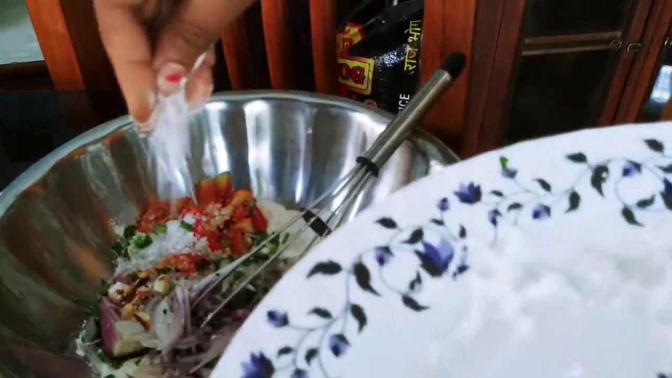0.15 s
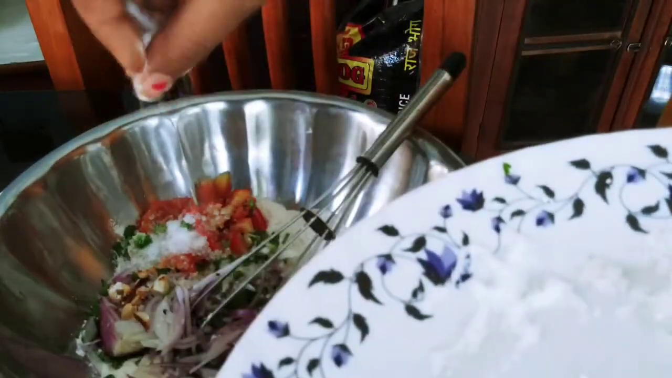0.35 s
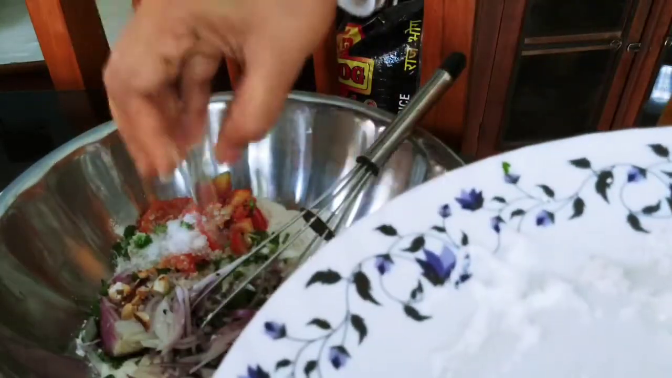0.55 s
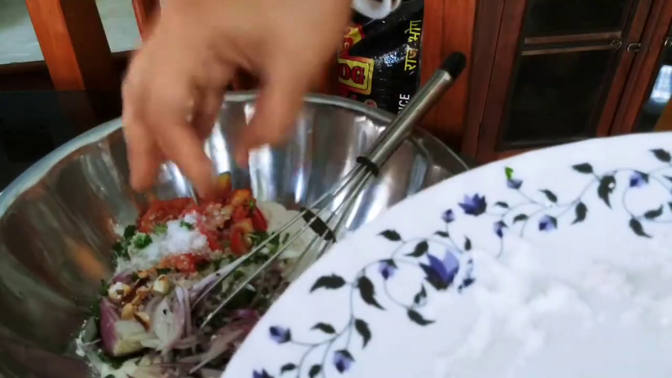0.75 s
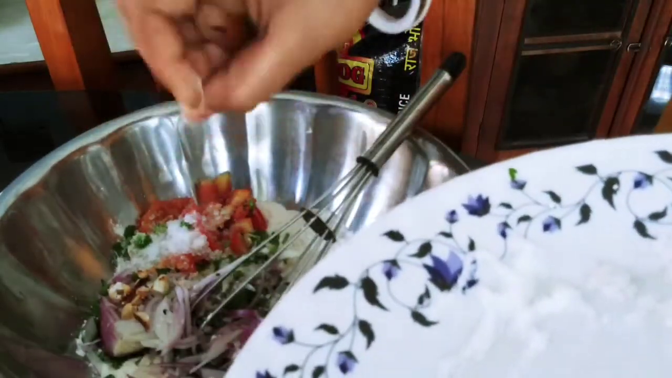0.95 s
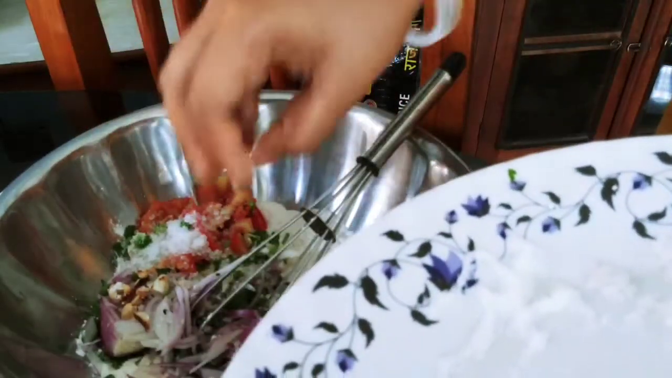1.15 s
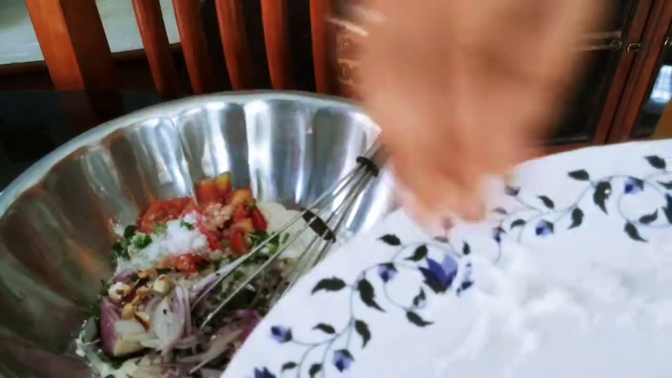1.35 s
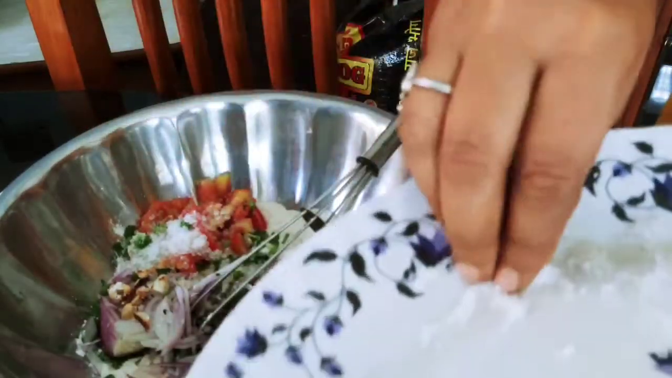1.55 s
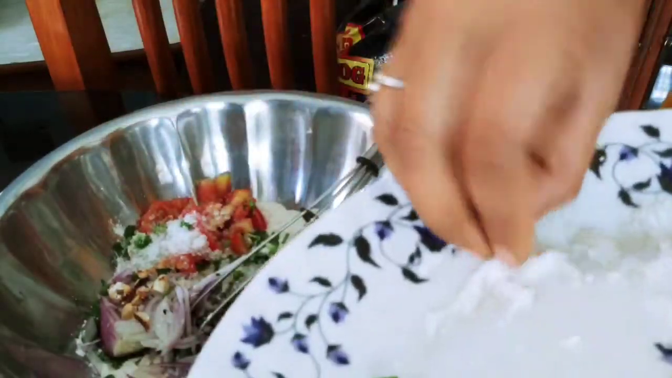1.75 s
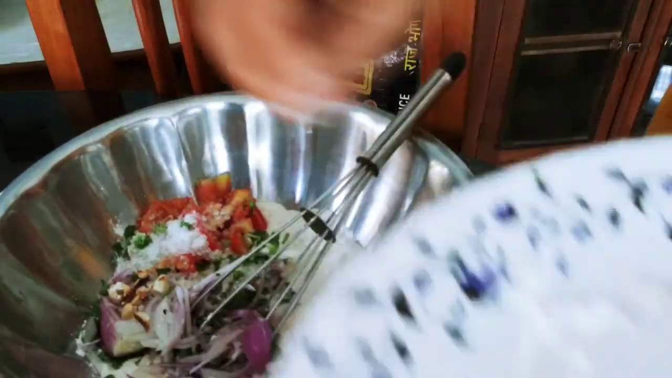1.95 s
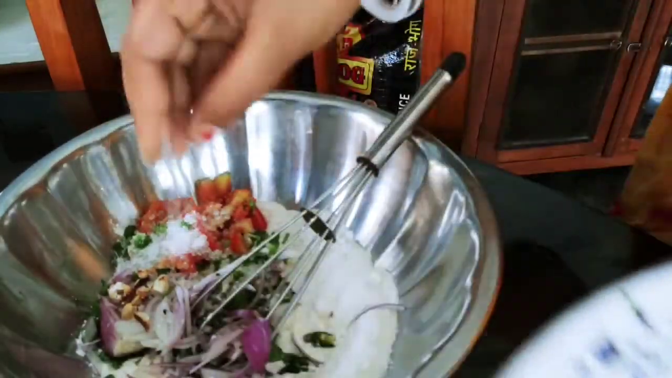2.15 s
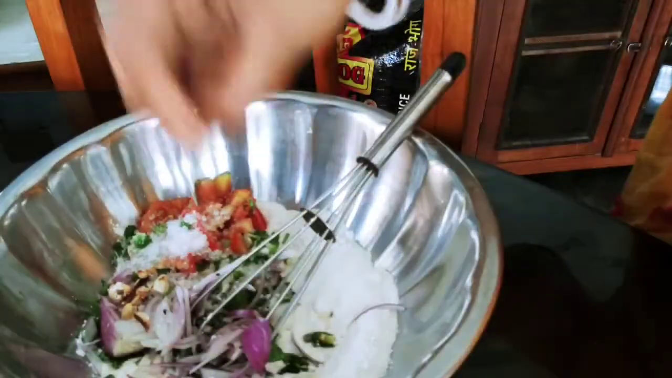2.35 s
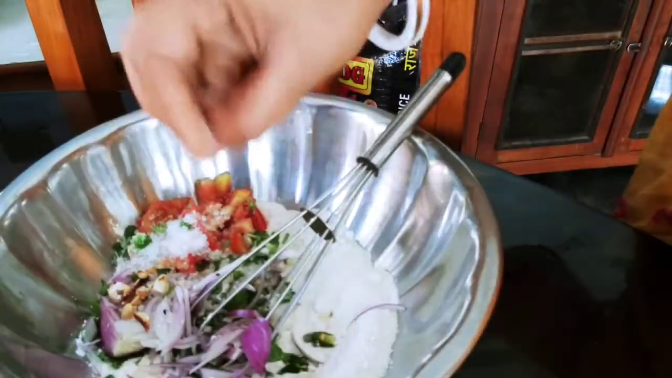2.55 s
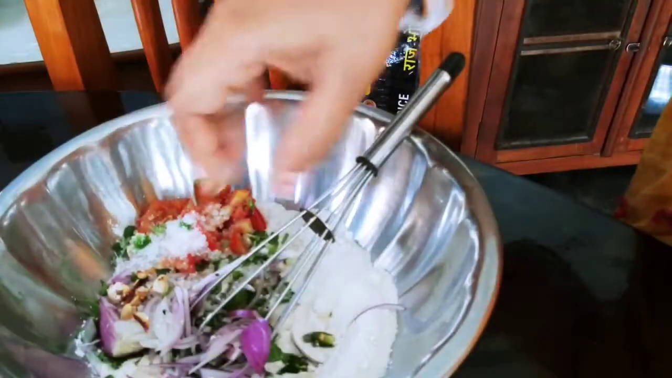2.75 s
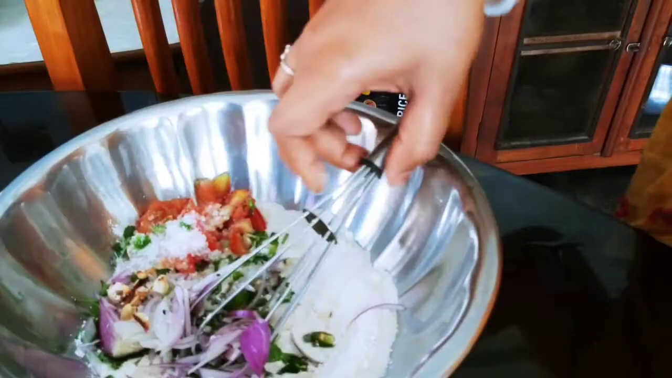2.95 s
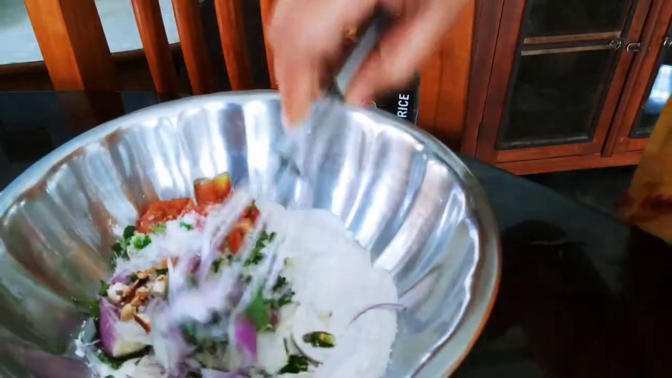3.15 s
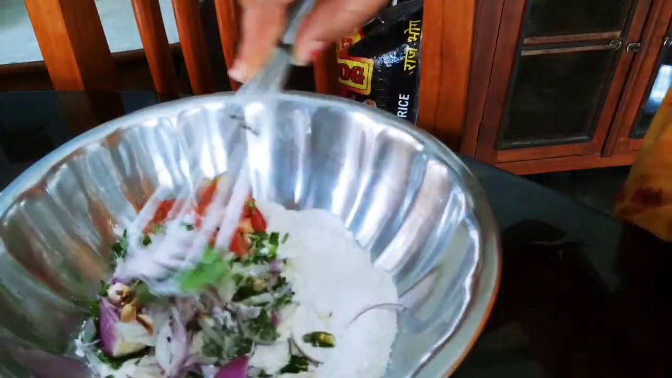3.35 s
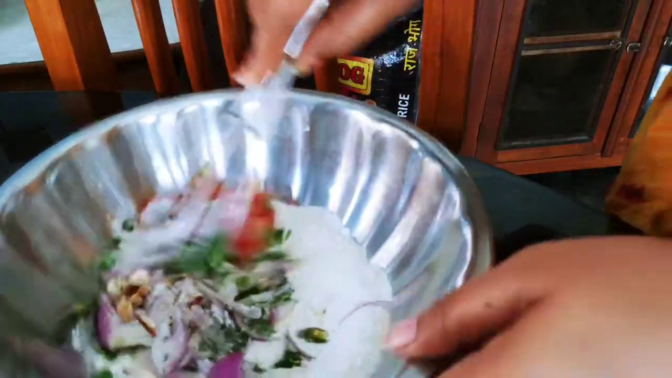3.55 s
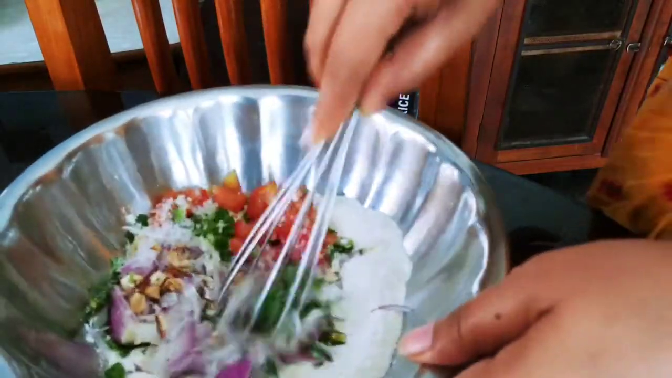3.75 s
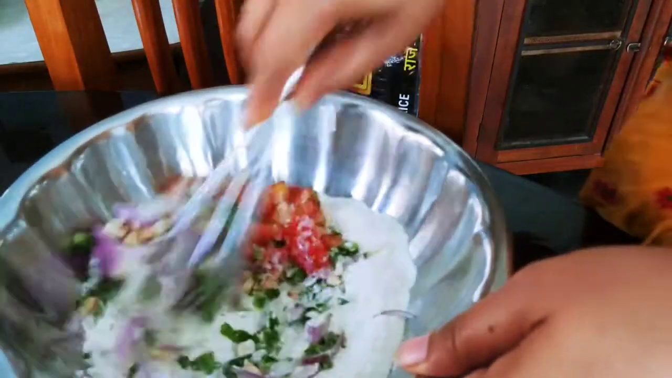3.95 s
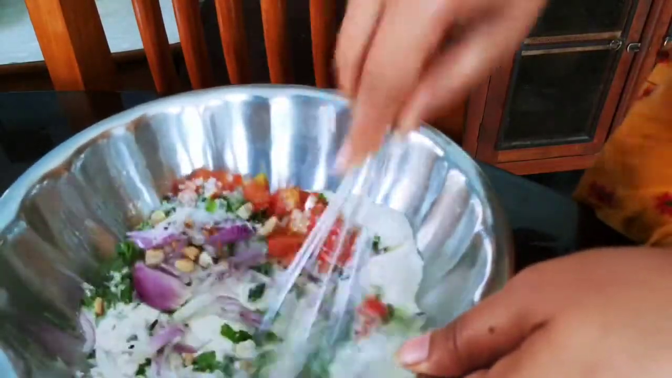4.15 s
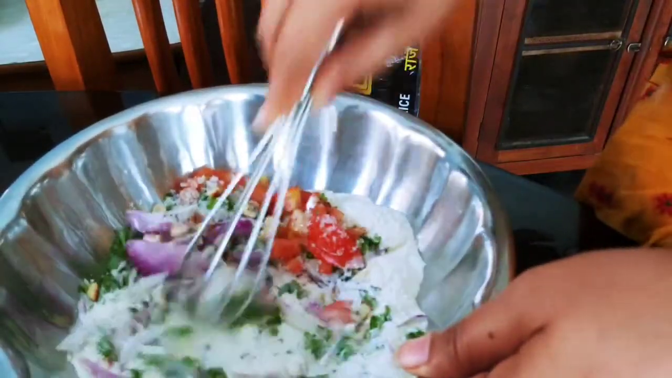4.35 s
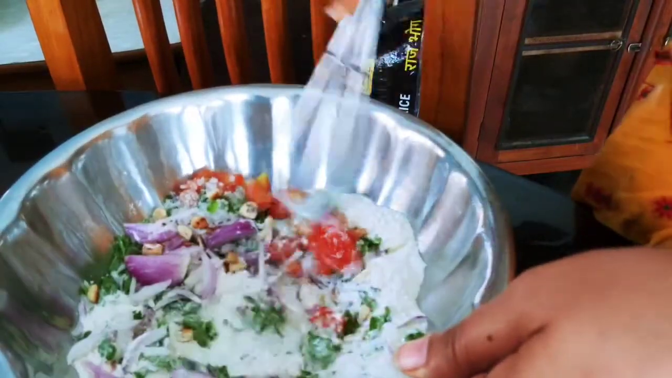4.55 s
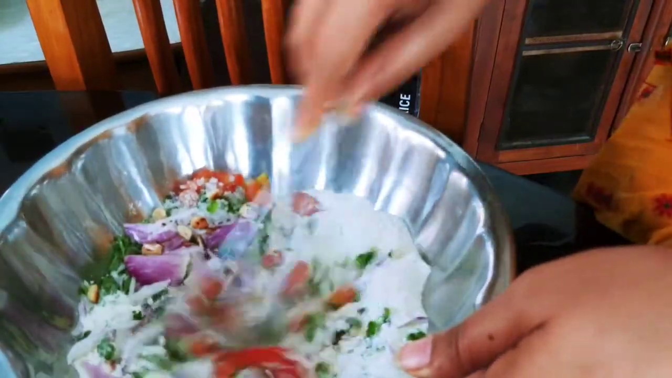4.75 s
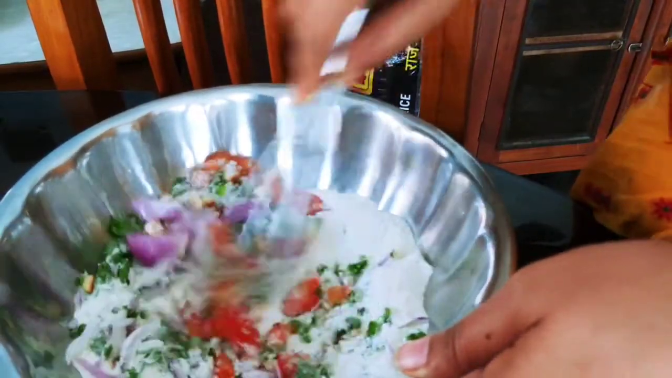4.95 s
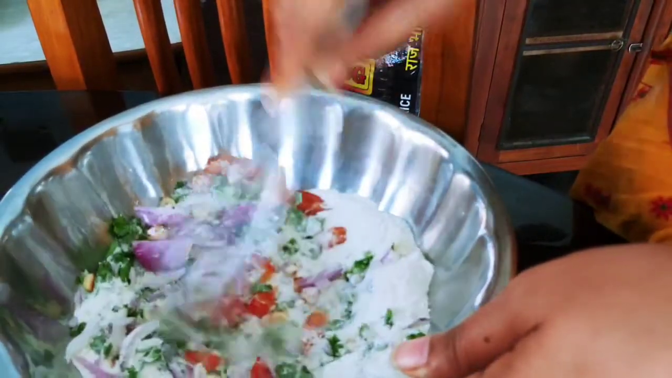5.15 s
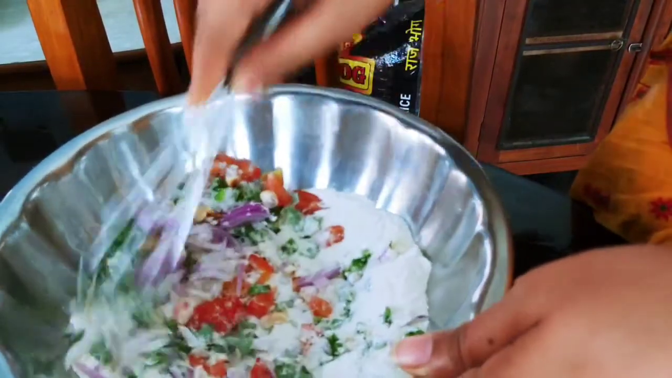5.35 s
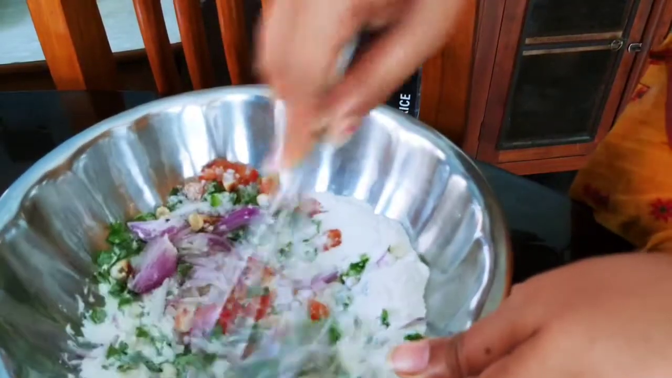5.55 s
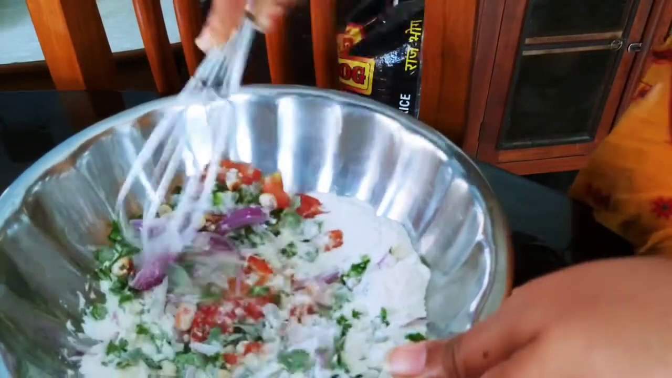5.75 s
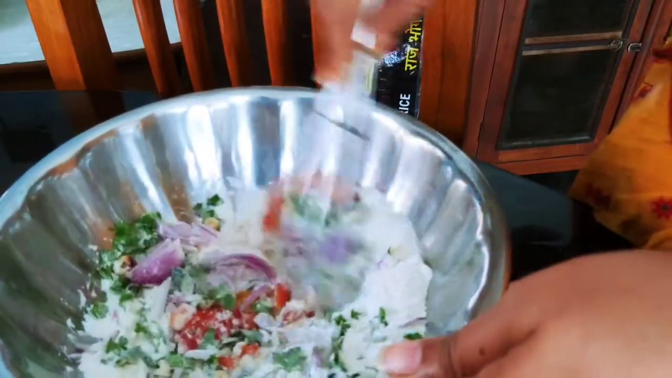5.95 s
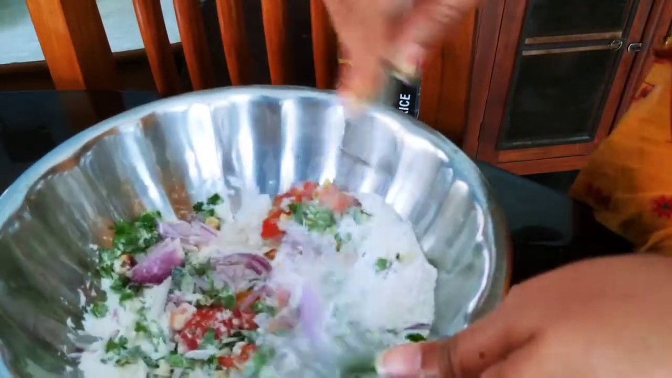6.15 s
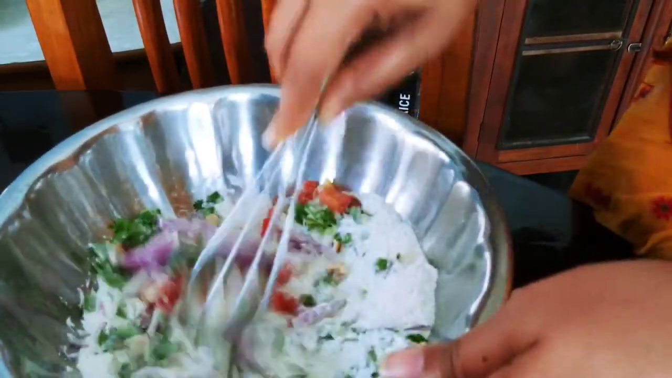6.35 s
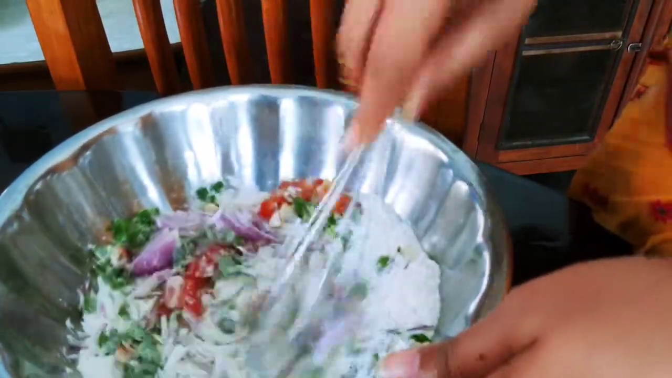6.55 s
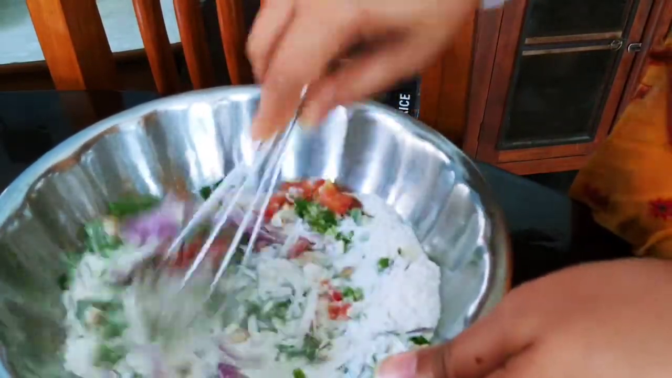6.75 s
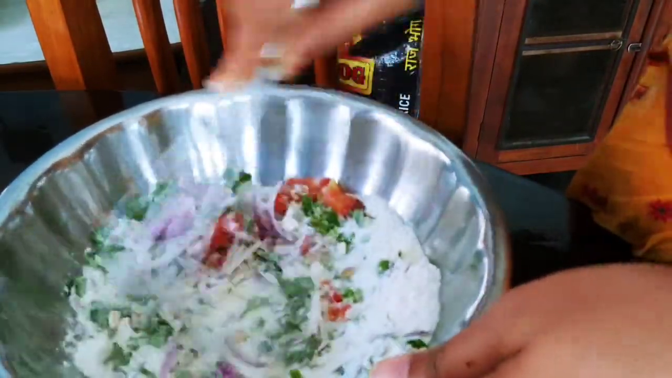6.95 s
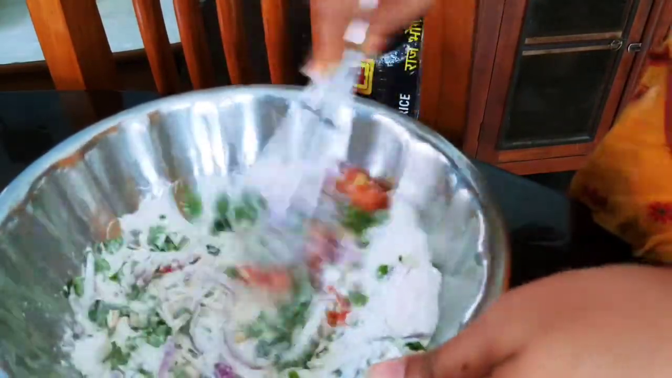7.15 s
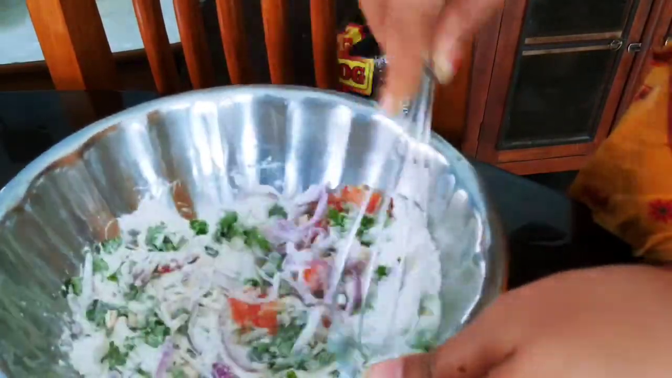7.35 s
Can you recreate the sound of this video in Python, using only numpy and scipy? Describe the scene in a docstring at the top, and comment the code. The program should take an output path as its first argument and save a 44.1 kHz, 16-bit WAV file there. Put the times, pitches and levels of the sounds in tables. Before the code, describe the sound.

Fingers softly sprinkle salt, a plate thuds down, and a wire whisk clicks and scrapes through vegetables in a steel bowl.

```python
"""Salt and a whisk in a steel bowl

In a quiet tiled kitchen, fingers sprinkle salt and pinch more from a plate, which rings softly.
A sleeve or the plate shifts with a dull thump, then the plate is set down with a thud and a chink.
A wire whisk knocks the rim of a steel bowl, then ploughs through flour and chopped vegetables,
clicking and squeaking on the steel. The room answers every hit with a short echo."""
import sys
import numpy as np
from scipy import signal
from scipy.fft import rfft, irfft, next_fast_len
from scipy.io import wavfile
from scipy.ndimage import uniform_filter1d

SR = 44100
rng = np.random.default_rng(int(sys.argv[2]) if len(sys.argv) > 2 else 0)


def pcm_store(signal):
    """Save signal as 16-bit PCM."""
    levels = np.round(np.clip(np.atleast_2d(signal), -1, 1) * 32767)
    wavfile.write(sys.argv[1], SR, levels.astype(np.int16).T)


N = 326061

# Low noise through table and floor. Each row: time in seconds, level in dB.
RUMBLE_LEVELS = [(0.0, -71), (0.43, -62), (0.68, -70.5), (1.25, -67), (2.36, -69), (2.65, -66.5),
                 (2.94, -72), (3.02, -55.5), (3.29, -63.5), (4.4, -66), (4.73, -68.5), (5.72, -55),
                 (6.25, -60), (6.52, -55.5), (6.79, -61), (7.39, -61)]
# Low hums and soft thuds. Each row: start in seconds, level in dB, pitch in Hz, length in seconds.
HUMS = [(.14, -52, 142.6, 0.41), (1.454, -48, 75, 0.013), (2.101, -51, 92.6, 0.15),
        (2.402, -57.5, 90, 0.081), (3.044, -47.5, 92.5, 0.19), (4.249, -52.5, 98.6, 0.16),
        (6.28, -49, 100, 0.095), (6.554, -52.5, 114.7, 0.18), (6.568, -42, 274, 0.035)]

# Hand movements. Each row: start and length in seconds, levels of the middle, dull and bright parts
# in dB, drift of the middle part over the length in dB.
HAND_RUSTLES = [(0.0, 0.18, -89, -60, -75.5, -4), (.25, 0.053, -64, -55, -68, -1),
                (.465, 0.023, -68, -66, -71, -2), (.535, 0.066, -62, -58, -61.5, -2.5),
                (.575, 0.063, -61, -52.5, -52, -7), (1.01, 0.017, -84, -72, -68.5, -7),
                (2.07, 0.38, -86.5, -56.5, -93, -15.5), (2.21, 0.011, -94, -80, -66.5, -7),
                (2.243, .012, -94, -80, -76, 2.5), (2.42, 0.091, -82.5, -67, -87, 0.5)]  # fingers rub salt, and a sleeve or the plate shifts with a dull thump
PINCHES = [(1.458, 0.028, -61, -64, -71, 0), (1.51, 0.031, -54, -57, -65, -0.5),
           (1.61, 0.05, -62, -81, -73, -0.5)]  # fingers pinch salt off the plate
WHISK_STROKES = [(2.93, 0.15, -64.5, -51, -65.5, -1.5), (3.508, 0.14, -58, -57.5, -58, 4),
                 (3.66, 0.23, -59.5, -64.5, -68, 4), (3.864, 0.31, -50, -62, -49, -9.5),
                 (4.2, 0.14, -57.5, -55.5, -58.5, 2), (4.606, 0.33, -51.5, -60, -52.5, -3.5),
                 (4.94, 0.058, -50.5, -81, -55, 2.5), (5.06, 0.17, -60.5, -59.5, -68.5, -2),
                 (5.358, 0.16, -51.5, -44, -50, -9.5), (5.47, 0.37, -54, -52.5, -51.5, -14),
                 (5.828, 0.37, -49.5, -52, -47, -15), (6.262, 0.017, -73, -69, -69.5, -4),
                 (6.285, 0.24, -53.5, -54, -55, -1.5), (6.575, 0.085, -60.5, -51, -61, 1),
                 (6.69, 0.11, -53, -49.5, -51.5, -0.5), (6.81, 0.06, -59, -57, -60, -4),
                 (6.985, 0.05, -72, -62, -67.5, 3.5), (7.045, 0.2, -57, -57.5, -56.5, -1.5),
                 (7.365, 0.02, -95, -64, -76, 10)]
# Single blows. Each row: time in seconds, strength in dB (each part of the sound adds its own offset).
NAIL_TAPS = [(1.456, -44), (1.5103, -38), (1.6306, -46.5)]
PLATE_LANDINGS = [(2.6978, -8)]
RIM_KNOCKS = [(3.033, -15.5), (3.048, -18)]
# Wires skid on steel. Each row: start and length in seconds, level in dB, first and last pitch in Hz.
WIRE_SKIDS = [(2.992, 0.035, -48, 2110, 2060), (4.094, 0.13, -54, 2950, 2476), (3.8, 0.29, -57, 779, 777),
              (4.262, 0.058, -50, 539, 557), (4.303, 0.096, -52, 777, 779), (4.631, 0.22, -62, 777, 780),
              (4.77, 0.02, -38.5, 3057, 3010), (4.795, 0.02, -40.5, 2880, 2800),
              (4.815, 0.014, -41.5, 2820, 2780), (4.936, 0.04, -55, 3040, 3240),
              (4.989, .03, -44, 3205, 2860), (5.014, 0.047, -53, 2750, 2750),
              (5.07, 0.044, -50, 3130, 2855), (5.11, 0.17, -58, 259.7, 262), (5.118, 0.18, -58.5, 515, 472),
              (6.04, 0.22, -58.5, 580, 506), (6.253, 0.1, -53.5, 568, 557),
              (6.316, 0.16, -49.5, 2930, 2830), (6.572, 0.072, -45, 2850, 2770),
              (6.716, 0.18, -53, 2750, 2650), (7.041, 0.055, -53, 2068, 2070)]
# Wires strike the bowl. Each row: time in seconds, clack level in dB, pitch in Hz, snap and crunch
# in dB above the clack, left minus right in dB.
WIRE_CLICKS = [(3.511, -40, 1560, -2, 8.5, 3), (3.533, -41, 2060, 6.5, -3, 2),
               (3.566, -33.5, 3060, -0.5, -8, -8), (3.6, -41, 1520, 10.5, -2, 4),
               (3.605, -36, 1950, -6, 0, 12), (3.864, -39.5, 855, -2, 11.5, 7),
               (3.877, -40, 840, 12, 7, -4), (3.924, -19.5, 2020, -31, -9.5, 2),
               (3.987, -40, 3000, -1, -12, -1), (4.05, -34, 3700, -13, -19, -4),
               (4.202, -39, 3870, -6, -19, 2), (4.298, -35, 3300, -22, -3, -4),
               (4.314, -42.5, 1700, -20, 7, -3), (4.329, -35, 3270, -24, 2, -6),
               (4.611, -38.5, 2980, 10.5, 6.5, 2), (4.624, -29.5, 1320, 0.5, 6, -2),
               (4.697, -30, 3300, 0.5, -16, 7.5), (4.774, -32, 3060, -29, -14, 5),
               (4.954, -30, 3240, -25, -11, 9.5), (4.976, -31, 3320, -14, -5, -5),
               (5.002, -27, 3260, -28, -20, -2), (5.075, -54, 3100, -17, -16, -2),
               (5.357, -7.5, 1970, -20.5, -0.5, 1), (5.48, -33, 760, -2, 9, 6.5),
               (5.492, -28, 3120, -20, -5, -10), (5.659, -39.5, 3040, -32, -6, -12.5),
               (5.704, -39, 2960, -21, -7, -1), (5.801, -30.5, 1890, -22, -1, 6),
               (5.82, -39, 1790, -7, 2, 12), (5.829, -14.5, 2410, -14.5, -5, 4),
               (5.945, -36.5, 1850, -1, -3, 5), (5.961, -34, 3080, -14, -3, -9),
               (6.02, -38.5, 3020, -9, -6, -1), (6.31, -40, 1790, -24, -6, -7),
               (6.344, -34, 2670, -13.5, 4, -6.5), (6.326, -38, 2880, -20, -6, -5),
               (6.422, -32.5, 2880, -6, -1, 0), (6.577, -37, 2800, -22, -17, -9),
               (6.614, -38, 2650, -6, -7, 0), (6.685, -42, 1030, -18, 11.5, -8),
               (6.714, -29, 1360, -22, 6, -1), (6.717, -29, 2220, -15, -15, 4),
               (6.994, -31, 2060, -30, -8, 1), (7.01, -38, 1990, -24, -14, 10),
               (7.05, -42, 2000, -3, -8, 11)]

# The notes struck things ring with. Each row: pitch in Hz, relative level in dB, seconds to fade
# by 60 dB (ring() divides this by its damping).
HELD_PLATE_NOTES = [(1950, 3, 0.19), (2456, -0.5, 0.34), (2810, 7, 0.12), (349, 2.5, 0.12),
                    (4650, -6.5, 0.15)]
PLATE_ON_TABLE_NOTES = [(118, -11, .6), (209, -4, .35), (240, -2, .3), (301, 1, .4), (350, -4, .4),
                        (368, -3, .45), (455, -6, .45), (550, -3, .5), (665, -10, .6), (780, -1, .45),
                        (907, -5, .55), (991, -7, .4), (1400, 0, .4), (1453, 1, .5), (1572, -10, .5),
                        (1720, -12, .3), (1900, -7, .28), (2229, -9, .4), (2400, -5, .5), (2460, -6, .5),
                        (2552, -8, .45), (2700, -10, .4), (3257, -13, .4)]
BOWL_NOTES = [(231, -6, .3), (511, -8, .36), (608, -13, .4), (689, -10, .55), (1050, -12, .4),
              (1230, -4, .25), (1507, -3, .4), (1567, -2, .42), (1836, -8, .28), (2040, -8, .4),
              (2099, -4, .4), (2600, -14, .45), (2719, -13, .26)]

# Tone colours of the noises. Each row: frequency in Hz, relative level in dB.
HUSH_TONE = [(12, -26), (20, -31), (153, -1), (316, -13.5), (481, -8.5), (1110, -14), (1350, -14.5),
             (2790, -15.5), (5590, -31.5), (6610, -26), (7820, -40), (9500, -31), (10900, -53),
             (12200, -24), (15700, -32)]
SALT_TONE = [(76, -33.5), (130, 1), (354, -12.5), (562, -12), (609, -13), (1180, -21.5), (2160, -12),
             (4440, -22), (5640, -21.5), (6500, -21), (11200, -25), (12300, -18), (15700, -14.5)]
THUD_TONE = [(88, -54), (150, -17), (453, -2), (1170, -13.5), (1450, -8.5), (1730, -12.5), (2410, -11),
             (3400, -18), (3900, -29), (5650, -25.5), (6730, -29), (8010, -38.5), (12300, -42),
             (15500, -48)]
FOOD_TONE = [(76, -33), (180, -3), (279, 0), (334, -7.5), (780, -1.5), (1100, -4.5), (2200, -1), (2900, -1),
             (3450, -5.5), (4000, -11.5), (5530, -13), (6630, -10), (7630, -21.5), (9510, -16.5),
             (11200, -34.5), (12300, -14.5), (15700, -20.5)]
SNAP_TONE = [(2350, -10), (4000, -6), (5160, -1), (5880, -24), (6590, -3), (7990, -12), (9910, -8),
             (11200, -19), (15500, -9.5)]
CRUNCH_TONE = [(150, -77), (250, -26), (1420, -8), (2040, -9), (3450, -14.5), (4130, -36), (6000, -33),
               (6670, -22), (7750, -36), (9000, -29), (11700, -84), (19800, -120)]

# The kitchen's echo. Each row: frequency in Hz, seconds to fade by 60 dB.
ROOM_FADE = [(100, 0.25), (500, 0.56), (2000, 0.7), (5000, 0.43), (8000, 0.42), (12000, 0.44)]
# How the two microphones differ. Each row: frequency in Hz, left minus right in dB.
MIC_BALANCE = [(60, -0.9), (400, -3), (1200, -3), (2500, -0.7), (5000, -6), (6000, 3), (6700, 13),
               (7800, 3), (11000, 2.5), (15000, -5.5)]
# How alike left and right are. Each row: frequency in Hz, likeness from 0 (unrelated) to 1 (the same).
MIC_LIKENESS = [(25, 0.3), (60, 1), (300, 0.9), (700, 0.33), (1500, 0), (6000, 0)]

# How movements swell, fade and drift; sets of three are for the middle, dull and bright parts.
FINGER_RISE_DB_PER_S, FINGER_FALL_DB_PER_S = 1102, (403, 393.5, 398)
WHISK_RISE_DB_PER_S, WHISK_FALL_DB_PER_S = 1502, (255, 154, 302)
DRIFT_SHARES = (1.0, 0.86, 2.15)


def gain(db):
    """Turn decibels into a number to multiply by."""
    return 10 ** (np.asarray(db) / 20)


def unit(x):
    """Scale a sound to an average (rms) level of 1."""
    return x / np.sqrt(np.mean(x ** 2))


def unit_peak(x):
    """Scale a sound so its 24 biggest samples are near 1."""
    return x / np.sqrt(np.mean(np.sort(np.abs(x), axis=None)[-24:] ** 2))


def look_up(table, hz):
    """Read between a table's rows on a log frequency scale."""
    freqs, values = np.transpose(table)
    return np.interp(np.log(hz + 1), np.log(freqs), values)


def add(out, start_s, sound):
    """Mix a stereo sound in at the given time."""
    i = int(start_s * SR)
    out[:, i:i + sound.shape[1]] += sound[:, :N - i]


def band(x, low_hz, high_hz):
    """Keep what lies between two frequencies."""
    return signal.sosfilt(signal.butter(2, [low_hz, high_hz], "bandpass", fs=SR, output="sos"), x)


def colour(x, tone):
    """Filter a sound to give it a tone colour."""
    cepstrum = irfft(np.log(gain(look_up(tone, np.fft.rfftfreq(2048, 1 / SR)))))
    cepstrum[1:1024] *= 2  # folded so that nothing sounds ahead of a hit
    cepstrum[1025:] = 0
    response = irfft(np.exp(rfft(cepstrum)))[:1024]
    return signal.fftconvolve(x, response.reshape((1,) * (x.ndim - 1) + (-1,)), axes=-1)[..., :x.shape[-1]]


def excite(x, response):
    """Let every sample of x set off a copy of the response."""
    return signal.fftconvolve(x, response, axes=1)[:, :N]


def stereo(a, b):
    """Blend two noises into left and right, alike in the bass and unrelated in the treble."""
    hz = np.fft.rfftfreq(next_fast_len(N + SR), 1 / SR)
    likeness = np.clip(look_up(MIC_LIKENESS, hz), 0, 1)
    mid = rfft(a, 2 * len(hz) - 2) * np.sqrt((1 + likeness) / 2)
    side = rfft(b, 2 * len(hz) - 2) * np.sqrt((1 - likeness) / 2)
    return np.array([irfft(mid + side), irfft(mid - side)])[:, :len(a)]


def wander(per_s):
    """A smooth random curve that heads for a new value per_s times a second."""
    hold = int(SR / per_s)
    steps = np.repeat(rng.standard_normal(N // hold + 1), hold)
    return unit(uniform_filter1d(uniform_filter1d(steps, hold), hold)[:N])


def burst(fade_s):
    """Two tiny puffs of noise, each spread evenly over all pitches."""
    t = np.arange(512) / SR
    shape = t * np.exp(-t / fade_s)
    x = rng.standard_normal((2, len(t)))
    for _ in range(3):  # each pass evens out the pitches more
        spectrum = rfft(x * shape)
        x = irfft(spectrum / np.abs(spectrum)) / (shape + shape.max() / 10) * shape.max()
    return np.pad(x * shape, ((0, 0), (0, 1536)))


def crack(tone, fade_s):
    """A hit with a tone colour, the same on both sides in the bass."""
    mid, side = burst(fade_s)
    side = signal.sosfilt(signal.butter(1, 600, "highpass", fs=SR, output="sos"), side)
    return unit_peak(colour(np.array([mid + side, mid - side]), tone))


def clack(hz, fade_s, width):
    """A hit with a rough pitch; it reaches the right microphone a little later."""
    x = band(burst(fade_s)[0], hz / width, hz * width)
    return unit_peak(np.array([x, np.roll(x, rng.integers(2, 9))]))


def ring(notes, damping, phase_spread, blur_hz):
    """A struck object's fading notes; two weaker tones close to each make it waver."""
    hz, db, fade_s = np.transpose(notes)[:, :, None]
    t = np.arange(SR // 2) / SR
    phase = phase_spread * rng.uniform(-1, 1, (len(hz), 1)) * (1 - look_up(MIC_LIKENESS, hz))
    phase = np.array([phase, -phase])  # left and right
    below, above = blur_hz * rng.uniform(0.29, 1.53, (2, len(hz), 1))
    neighbours = (1, hz), (0.59, hz - below), (0.51, hz + above)
    tones = sum(size * np.sin(2 * np.pi * f * t + phase) for size, f in neighbours)
    tones *= gain(db - 60 * t * damping / fade_s)
    attack = np.minimum(t / 0.0034, 1)
    return tones.sum(axis=1) * attack / np.sqrt(np.sum(gain(db) ** 2))


def grains(tone, per_s, spread_db, hiss_db):
    """Countless small collisions of uneven size over a smooth hiss."""
    hits = rng.random((2, N)) < per_s / SR
    sizes = np.minimum(rng.exponential(size=(2, N)), 3.5)
    patter = unit(hits * gain(spread_db * sizes) * rng.standard_normal((2, N)))
    hiss = gain(hiss_db) * rng.standard_normal((2, N))
    return unit(colour(stereo(*(patter + hiss)), tone))


def movement_levels(moves, rise_db_per_s, fall_db_per_s):
    """Middle, dull and bright level curves in dB: each move rises fast, drifts, then falls away."""
    t = np.arange(0, N / SR + .002, .002)
    start_s, length_s, *levels, drift_db = np.transpose(moves)[:, :, None]
    progress = np.clip((t - start_s) / length_s, 0, 1)
    before_s, after_s = np.maximum(start_s - t, 0), np.maximum(t - start_s - length_s, 0)
    curves = []
    for db, fall, share in zip(levels, fall_db_per_s, DRIFT_SHARES):
        move_db = db + share * drift_db * progress - rise_db_per_s * before_s - fall * after_s
        power = np.sum(gain(move_db) ** 2, axis=0)
        curves.append(np.interp(np.arange(N) / SR, t, 10 * np.log10(power + 1e-14)))
    return curves


def rustle(x, levels, flicker_db):
    """Grain noise in three parts follows the level curves; they flicker together and a little alone."""
    middle_db, dull_db, bright_db = levels
    parts = ((band(x, 120, 1000), dull_db),
             (-band(x, 1000, 4500), middle_db),  # flipped so the parts add up where they overlap
             (band(x, 4500, 16000), bright_db))
    together = wander(45)
    return sum(unit(part) * gain(db + flicker_db * together + wander(25)) for part, db in parts)


def hush():
    """Air and distant house noise, gently rising and falling."""
    air = unit(colour(stereo(*rng.standard_normal((2, N))), HUSH_TONE))
    return air * gain(-64.5 + 2.4 * wander(4.2))


def rumble():
    """Low noise through table and floor, with soft hums that swell and fade."""
    noise = unit(band(stereo(*rng.standard_normal((2, N))), 25.5, 238))
    level_db = np.interp(np.arange(N) / SR, *np.transpose(RUMBLE_LEVELS))
    out = noise * gain(level_db + 0.7 * wander(22))
    for start_s, db, hz, length_s in HUMS:
        t = np.arange(int(length_s * SR)) / SR
        hum = gain(db) * np.sin(np.pi * t / length_s) * np.sin(2 * np.pi * hz * t)
        add(out, start_s, np.array([hum, hum]))
    return out


def room_echo(x):
    """The walls answer after 6 ms with fading noise; the middle pitches last longest."""
    t, tail = np.arange(SR) / SR, 0
    for hz in 60 * 2 ** np.arange(0, 8.1, .5):
        noise = band(rng.standard_normal((2, SR)), hz / 2 ** .25, hz * 2 ** .25)
        tail = tail + noise * gain(-60 * t / look_up(ROOM_FADE, hz))
    tail = stereo(*(tail * (t > .006)))
    return excite(x.mean(axis=0, keepdims=True), tail / np.sqrt(np.sum(tail[0] ** 2)))


def hands_and_salt():
    """Rubbed salt patters, a sleeve or the plate shifts, and pinching salt off the plate makes it sing."""
    patter = grains(SALT_TONE, per_s=2500, spread_db=1.8, hiss_db=-1.4)
    plate = ring(HELD_PLATE_NOTES, damping=0.87, phase_spread=0.63, blur_hz=24)
    rubbing = patter + gain(-7) * unit(excite(patter, plate))
    hands = movement_levels(HAND_RUSTLES, FINGER_RISE_DB_PER_S, FINGER_FALL_DB_PER_S)
    pinches = movement_levels(PINCHES, FINGER_RISE_DB_PER_S, FINGER_FALL_DB_PER_S)
    return rustle(patter, hands, flicker_db=1.2) + rustle(rubbing, pinches, flicker_db=0.81)


def nail_taps():
    """Nails tap the held plate. Gives the hits and the brief ringing separately."""
    hits, rings = np.zeros((2, 2, N))
    for start_s, db in NAIL_TAPS:
        add(rings, start_s, gain(db - 5) * ring(HELD_PLATE_NOTES, damping=2.7, phase_spread=1, blur_hz=52))
        add(hits, start_s, gain(db - 25) * crack(SALT_TONE, fade_s=0.00096))
    return np.array([hits, rings])


def plate_thud():
    """The plate lands and rings with the table top. Gives the hit and the ringing separately."""
    hits, rings = np.zeros((2, 2, N))
    for start_s, db in PLATE_LANDINGS:
        add(hits, start_s, gain(db) * crack(THUD_TONE, fade_s=0.0012))
        notes = ring(PLATE_ON_TABLE_NOTES, damping=0.76, phase_spread=1.2, blur_hz=16)
        add(rings, start_s, gain(db - 15.5) * notes)
    return np.array([hits, rings])


def plate_chink(sizzle_s=0.5):
    """The plate's foot meets the table with a bright tick and a short sizzle."""
    out, t = np.zeros((2, N)), np.arange(SR // 4) / SR
    for start_s, db in PLATE_LANDINGS:
        add(out, start_s, gain(db - 10) * clack(6500, fade_s=0.00026, width=1.08))
        sizzle = unit(band(rng.standard_normal((2, len(t))), 6400, 7000))
        add(out, start_s, gain(db - 40 - 60 * t / sizzle_s) * sizzle)
    return out


def rim_knocks():
    """The whisk handle knocks the bowl's rim. Gives the hits and the ringing separately."""
    hits, rings = np.zeros((2, 2, N))
    for start_s, db in RIM_KNOCKS:
        add(hits, start_s, gain(db - 11.5) * band(crack(THUD_TONE, fade_s=0.0031), 610, 5400))
        add(rings, start_s, gain(db - 13) * ring(BOWL_NOTES, damping=1.21, phase_spread=0.98, blur_hz=40.4))
    return np.array([hits, rings])


def food_ticks(stroke_db, per_s=30):
    """Wires hit small hard bits in random bunches, louder when the stroke is stronger."""
    out = np.zeros((2, N))
    bunching = gain(6 * wander(12))
    for hz in (1300, 2700, 4300):
        size_db = 7 + 3 * np.minimum(rng.exponential(size=N), 2.5)
        ticks = (rng.random(N) < bunching * per_s / SR) * gain(stroke_db + size_db)
        out += excite(ticks[None], clack(hz, fade_s=0.0004, width=1.4))
    return out


def wire_squeaks(width_share=0.2, waver_share=0.025):
    """Wires skid on steel in quick, uneven slips that sing a thin, wavering, gliding squeak."""
    out = np.zeros((2, N))
    slips, waver = gain(3.5 * wander(90)), wander(40)
    for start_s, length_s, db, hz, end_hz in WIRE_SKIDS:
        i, t = int(start_s * SR), np.arange(int(length_s * SR)) / SR
        pitch = (hz + (end_hz - hz) * t / length_s) * (1 + waver_share * waver[i:i + len(t)])
        phase = 2 * np.pi * np.cumsum(pitch) / SR
        # slow noise times a tone makes a narrow band of noise that follows the pitch
        noise = rng.standard_normal((2, 2, len(t)))
        a, b = uniform_filter1d(noise, int(SR / (width_share * hz)), mode="wrap")
        squeak = unit((a * np.cos(phase) + b * np.sin(phase)) * slips[i:i + len(t)])
        swell = np.sqrt(np.sin(np.pi * np.sqrt(t / length_s)))
        add(out, start_s, gain(db) * squeak * swell)
    return out


def whisking():
    """Wires plough through flour and vegetables, rustling, ticking and squeaking."""
    food = grains(FOOD_TONE, per_s=900, spread_db=2.6, hiss_db=6.2)
    levels = movement_levels(WHISK_STROKES, WHISK_RISE_DB_PER_S, WHISK_FALL_DB_PER_S)
    return rustle(food, levels, flicker_db=2.2) + food_ticks(levels[0]) + wire_squeaks()


def wire_clicks(shiver_s=0.24):
    """Wires strike the bowl with a clack, snap and crunch, then shiver; the held bowl rings faintly."""
    out, t = np.zeros((2, N)), np.arange(SR // 4) / SR
    for start_s, db, hz, snap_db, crunch_db, pan_db in WIRE_CLICKS:
        sides = gain(db + np.array([[pan_db], [-pan_db]]) / 2)
        add(out, start_s, sides * clack(hz, fade_s=0.000263, width=1.12))
        snap = gain(snap_db) * crack(SNAP_TONE, fade_s=0.00096)
        crunch = gain(crunch_db) * crack(CRUNCH_TONE, fade_s=0.000564)
        add(out, start_s, sides * (snap + crunch))
        shiver = unit(band(rng.standard_normal((2, len(t))), hz / 1.35, hz * 1.35))
        add(out, start_s, sides * gain(-25 - 60 * t / shiver_s) * shiver)
    bowl = ring(BOWL_NOTES, damping=1.6, phase_spread=0.99, blur_hz=14.6)
    return out + gain(-51) * excite(out, bowl)


def scene():
    """Mix it all: blunt thuds fill the room most; rings, rustles and clicks less."""
    clicks = wire_clicks() + plate_chink()
    thuds, rings = plate_thud() + rim_knocks() + nail_taps()
    rustles = hands_and_salt() + whisking()
    echo = room_echo(gain(-13) * clicks + gain(-1) * thuds + gain(-9) * rings + gain(-8.5) * rustles)
    return clicks + thuds + rings + rustles + echo + rumble() + hush()


def record(dry):
    """A phone's two microphones differ in tone (the left rings near 7 kHz); the top treble is cut."""
    left = colour(dry[0], [(hz, db / 2) for hz, db in MIC_BALANCE])
    right = colour(dry[1], [(hz, -db / 2) for hz, db in MIC_BALANCE])
    treble_cut = signal.ellip(10, .2, 80, 15800, fs=SR, output="sos")
    return signal.sosfilt(treble_cut, np.array([left, right]))


dry = scene()
out = record(dry)
pcm_store(out)
```